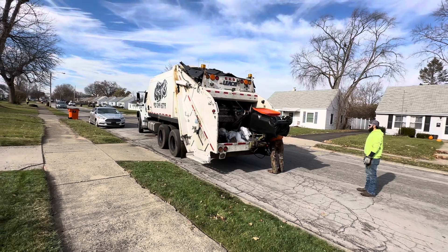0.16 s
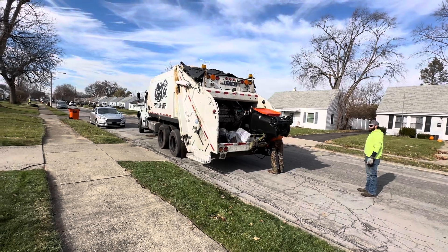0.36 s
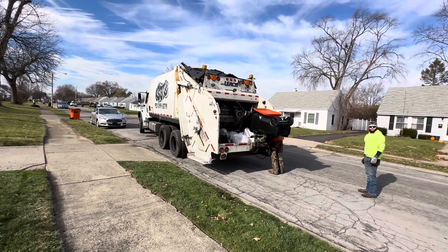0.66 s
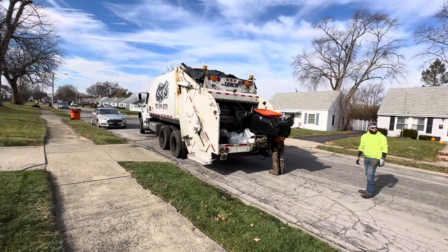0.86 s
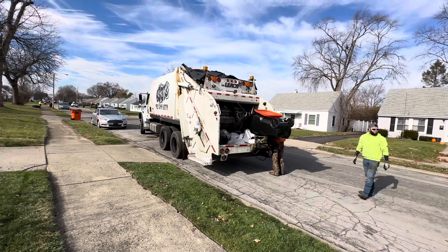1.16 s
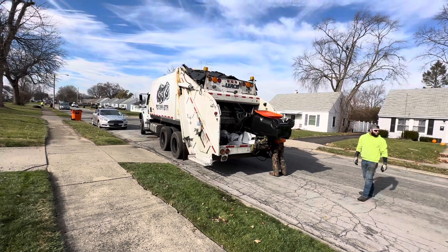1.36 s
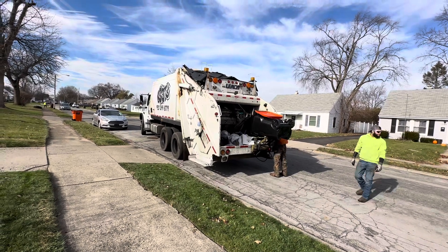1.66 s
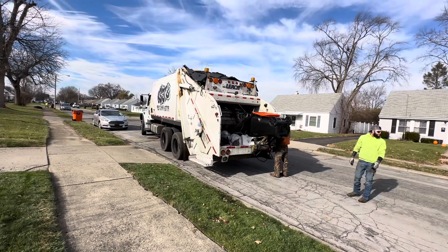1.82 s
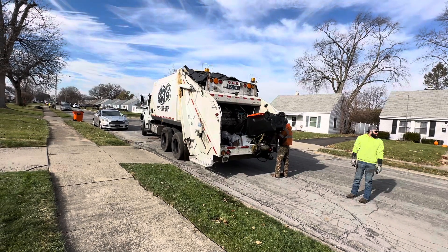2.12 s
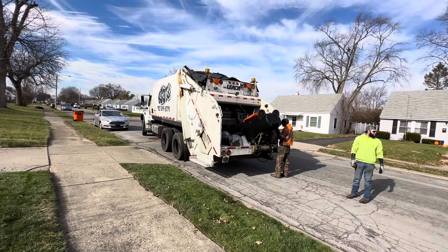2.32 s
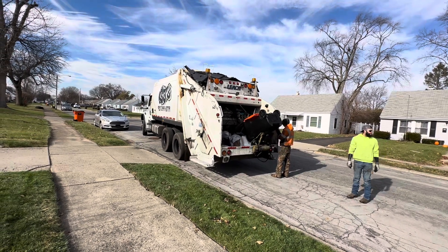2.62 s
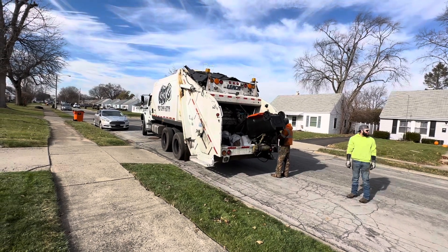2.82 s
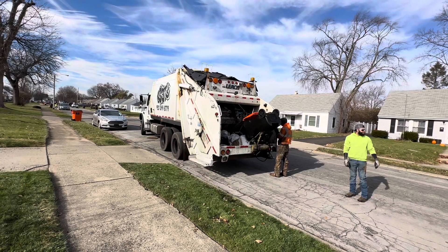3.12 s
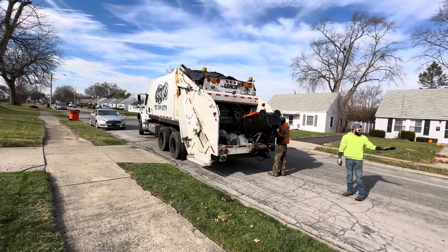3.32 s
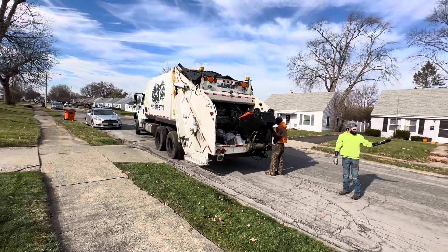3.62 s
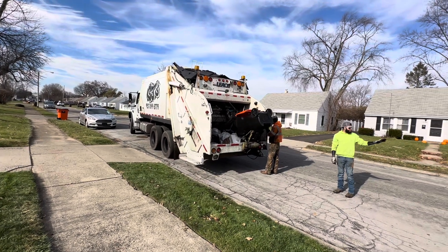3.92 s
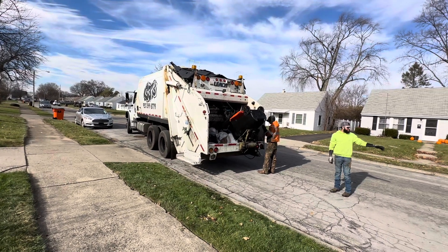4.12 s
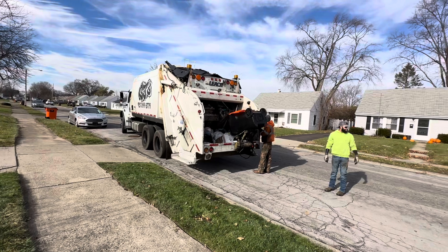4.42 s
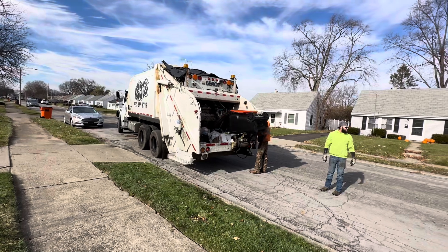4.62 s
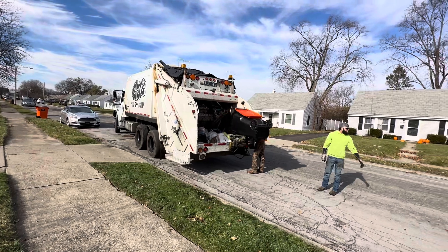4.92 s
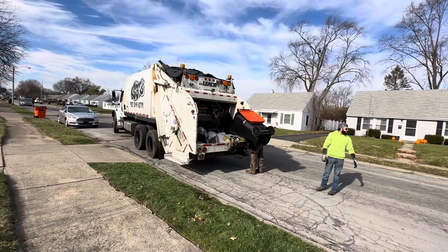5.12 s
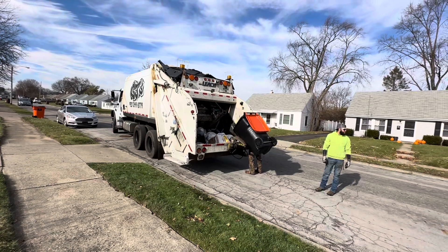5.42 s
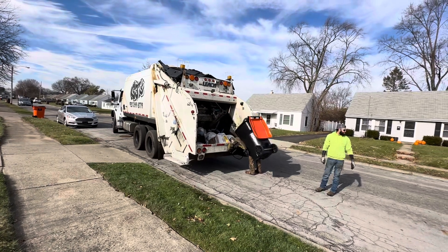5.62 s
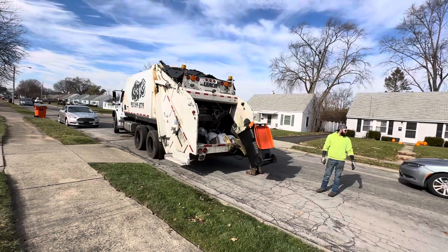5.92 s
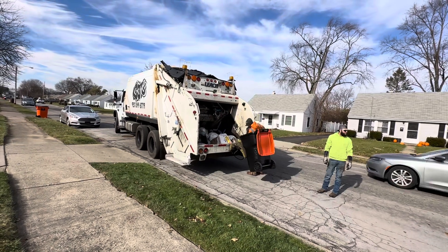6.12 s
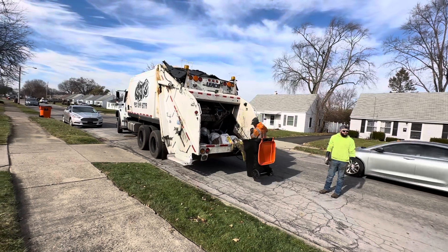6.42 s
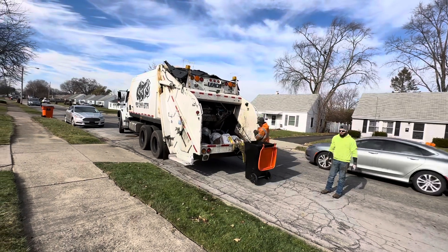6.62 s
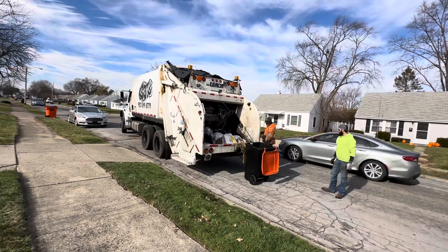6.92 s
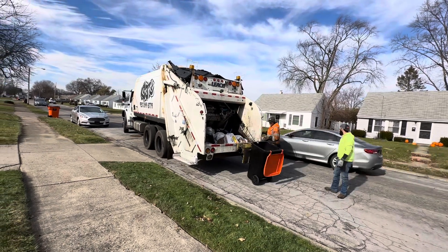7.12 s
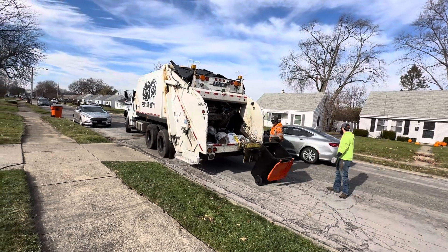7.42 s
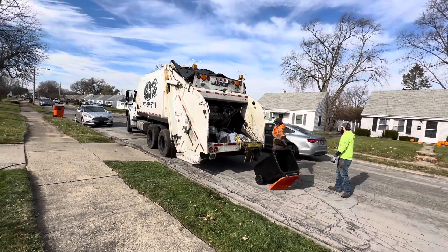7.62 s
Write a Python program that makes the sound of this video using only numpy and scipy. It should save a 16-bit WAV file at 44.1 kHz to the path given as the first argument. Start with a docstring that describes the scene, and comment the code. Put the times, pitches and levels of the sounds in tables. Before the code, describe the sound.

On a street, a refuse truck's diesel rumbles, hisses and rattles throughout, near the microphone and to the left. The revs rise a little and a plastic bin is shaken against the hopper in a run of hollow knocks and heavy thuds, while rubbish rustles softly out and pivots squeak thinly. After a pause in the knocking, the bin lands on the road with loud, sharp bangs as a car rolls past on the right.

```python
"""A refuse truck's diesel runs on a street, close to a microphone with two ports: truck left, bin right.
The engine roars, hisses, clatters with each firing and whines at its shafts and gears. It speeds up as the
hydraulic lifter raises a plastic bin on squeaking pivots, shakes it against the hopper and lowers it.
Rubbish rustles out; contacts ring the bin's walls and the hopper's panels, and metal clinks.
The bin drops on the road and tips over as a car's tyres roll by."""
import sys
import numpy as np
from scipy import signal
from scipy.fft import rfft, irfft
from scipy.io import wavfile

SR = 44100
rng = np.random.default_rng(int(sys.argv[2]) if len(sys.argv) > 2 else 0)


def dump_mix(stems):
    """Bounce the given channels to the path in sys.argv[1] as a 16-bit WAV at rate SR."""
    frames = np.atleast_2d(stems).T  # one column per channel
    limited = np.clip(frames, -1, 1)  # hard clip at full scale
    pcm = np.round(limited * 32767).astype(np.int16)
    wavfile.write(sys.argv[1], SR, pcm)


N = 342208
TIME = np.arange(N) / SR
HZ = np.maximum(np.arange(N // 2 + 1) * SR / N, 1)


def amp(db):
    return 10 ** (np.asarray(db) / 20)


def unit_rms(x):
    return x / np.sqrt(np.mean(x ** 2, axis=-1, keepdims=True) + 1e-20)


def in_time(curve):
    return np.interp(TIME, *np.transpose(curve))


def at_hz(curve):
    hz, value = np.transpose(curve)
    return np.interp(np.log(HZ), np.log(np.maximum(hz, 1)), value)


def noise_pair():
    return rng.standard_normal((2, N))


def colour(x, spectrum):
    """Gives a steady sound its spectrum, nothing outside it; rms 1."""
    inside = (HZ > spectrum[0][0]) & (HZ < spectrum[-1][0])
    return unit_rms(irfft(rfft(x) * amp(at_hz(spectrum)) * inside, N))


def drift(rate_hz):
    """A smooth random wander; rms 1."""
    step = 40
    pole = np.exp(-2 * np.pi * rate_hz * step / SR)
    slow = signal.lfilter([1], [1, -2 * pole, pole ** 2], rng.standard_normal(N // step + 2002))[2000:]
    return np.interp(np.arange(N) / step, np.arange(len(slow)), unit_rms(slow))


def tone(hz, level_db, waver_hz):
    """A sine that wavers in pitch and around its rms level."""
    gain = np.sqrt(2) * amp(level_db + 2 * drift(5.7))
    return gain * np.sin(2 * np.pi * np.cumsum(hz + waver_hz * drift(34)) / SR)


def noise_band(hz, width_hz):
    """A narrow band of noise that follows a pitch; rms 1."""
    pole = np.exp(-np.pi * width_hz / SR)
    real, imag = unit_rms(signal.lfilter([1], [1, -2 * pole, pole ** 2], noise_pair()))
    phase = 2 * np.pi * np.cumsum(hz) / SR
    return real * np.cos(phase) + imag * np.sin(phase)


def ring(force, modes):
    """Drives a body's modes, neighbours in opposite phase, each with a new random strength."""
    out = 0
    for k, (hz, level_db, t60_s) in enumerate(modes):
        pole, angle = amp(-60 / (t60_s * SR)), 2 * np.pi * hz / SR
        mode = signal.lfilter([0, np.sin(angle)], [1, -2 * pole * np.cos(angle), pole ** 2], force + 1e-18)
        out = out + amp(level_db) * rng.normal(1, 0.2) * (-1) ** k * mode
    return out


def add_hit(out, hit, start_s, peak_db):
    i = round(start_s * SR)
    out[i:i + len(hit)] += (amp(peak_db) * hit / np.abs(hit).max())[:N - i]


# The engine's low noise, close by: frequency_hz, relative_db
ROAR_SPECTRUM = [(22, -37), (65, -4.5), (130, -4), (167, -1), (190, -5), (221, 3), (262, -5.5), (289, -4),
                 (391, -9.5), (470, -14.5), (503, -11.5), (859, -13.5), (1050, -25.5), (1200, -20),
                 (1560, -25), (2000, -53)]
def roar(effort_db):
    """The diesel roars louder as it works harder."""
    return amp(-19.5 + effort_db + .5 * drift(31)) * colour(noise_pair(), ROAR_SPECTRUM)


# The engine's high noise: frequency_hz, relative_db
HISS_SPECTRUM = [(1760, -40), (3000, 1), (3440, -1.5), (4760, -5), (5310, -12.5), (6490, -8.5),
                 (7500, -16.5), (8030, -12), (11100, -21), (12700, -31.5), (15600, -36)]
def hiss(effort_db):
    """A flickering hiss follows the engine's effort weakly."""
    return amp(-44 + 0.37 * effort_db + 0.93 * drift(21)) * colour(noise_pair(), HISS_SPECTRUM)


# Lines of shafts and gears: tooth_rate_multiple
GEAR_ORDERS = [.192, 1, 1.385, 2, 4.2, 5, 5.305, 3.79, 5.648]
# Each line's level in the engine's three colours: early_db, middle_db, late_db
GEAR_LEVELS = [(-25, -53, -49), (-38.5, -38, -26.5), (-48, -34, -39), (-29, -69, -48.5), (-56, -31.5, -38),
               (-30, -65, -54), (-27.5, -66, -50), (-70, -44, -37), (-58, -29, -92)]
def gear_whine(tooth_hz, shares):
    """Shafts and gears sing at multiples of the pump's tooth rate; their balance shifts over time."""
    return sum(tone(order * tooth_hz, np.dot(levels_db, shares), waver_hz=.6 * order)
               for order, levels_db in zip(GEAR_ORDERS, GEAR_LEVELS))


# The engine's note: time_s, level_db
HUM_LEVEL = [(0, -25), (2.0, -27.5), (2.62, -25.5), (2.8, -38.5), (3.88, -37.5), (4.1, -27.5),
             (7.76, -32.5)]
def engine_hum(tooth_hz, order=.6925):
    """A rough, fluttering note follows the engine's speed."""
    return tone(order * tooth_hz, in_time(HUM_LEVEL) + 2.5 * drift(8.5), waver_hz=4)


# The clatter's three hollow, notched colours at the microphone: frequency_hz, relative_db
EARLY_SPECTRUM = [(900, -19), (954, -4), (1030, -5), (1140, -17), (1500, -1.5), (1900, -7), (2190, 1),
                  (2320, 2), (2480, -11.5), (2810, -9.5), (3320, -14), (3600, -57)]
MIDDLE_SPECTRUM = [(530, -21), (900, -1.5), (976, 0), (1100, -26), (1400, 2), (1710, -13), (1850, -1),
                   (2370, -13.5), (2630, -1.5), (3010, -22), (3600, -18.5), (4680, -39)]
LATE_SPECTRUM = [(530, -45), (900, -2), (970, -17), (1030, -33), (1240, -5.5), (1310, 6.5), (1590, -23.5),
                 (1730, 4.5), (1810, 3), (2020, 0.5), (2180, -31), (2370, -6), (2510, 5), (2600, -2.5),
                 (2780, -17), (2930, -4.5), (3080, -7), (3320, -18.5), (4680, -17)]
def clatter(tooth_hz, shares, firings_per_tooth=.0843, throb_db=0.9):
    """Each firing repeats one rattle of valves and injectors, over noise; both throb with the firings."""
    firings = np.cumsum(firings_per_tooth * tooth_hz) / SR
    pulses = np.diff(np.floor(firings), prepend=0) * amp(1.3 * drift(31))
    t = np.arange(2205) / SR
    burst = rng.standard_normal((2, len(t))) * np.exp(-t / .03)
    white_rattle = irfft(np.exp(1j * np.angle(rfft(burst))), len(t))
    repeated = unit_rms(signal.fftconvolve(pulses[None], white_rattle, axes=1)[:, :N])
    evenness = np.dot([.3, .6, .78], shares)   # most even in the late colour
    source = np.sqrt(evenness) * repeated + np.sqrt(1 - evenness) * noise_pair()
    source *= amp(throb_db * np.cos(2 * np.pi * firings))
    spectra = EARLY_SPECTRUM, MIDDLE_SPECTRUM, LATE_SPECTRUM
    return sum(share * colour(source, spectrum) for share, spectrum in zip(shares, spectra))


# How the engine's tone shifts over time: change_s, middle_colour_share, late_colour_share
TONE_SHIFTS = [(0, 0.19, 0.18), (2.2, 0.24, 0.38), (2.75, 0.52, 0.11), (3.5, 0.67, 0.071),
               (4.33, 0.01, 0.77), (6.72, 0.38, 0.17)]
def colour_shares(blend_s=0.39):
    """Each mix of the early, middle and late colours blends into the next; the shares sum to 1."""
    change_s, *columns = np.transpose(TONE_SHIFTS)
    arrived = np.clip((TIME - change_s[1:, None]) / blend_s + .5, 0, 1)
    middle, late = np.clip([share[0] + np.diff(share) @ arrived for share in columns], 0, 1)
    shares = np.array([np.clip(1 - middle - late, 0, 1), middle, late])
    return shares / shares.sum(axis=0)


# Engine speed at the hydraulic pump: time_s, tooth_rate_hz
PUMP_SPEED = [(0, 420), (1.5, 422), (2.05, 436), (2.7, 480), (3.25, 485), (4.6, 473.5), (7.1, 469.5),
              (7.76, 474)]
# How hard the engine works: time_s, effort_db
ENGINE_EFFORT = [(0, 0), (1.2, -1), (2.0, -.5), (2.7, 2), (3.3, 1), (4.4, .5), (6.4, -1), (7.76, -2)]
def diesel():
    """The engine close on the left, as a direct and a diffuse signal; its tones are direct only."""
    tooth_hz, effort_db, shares = in_time(PUMP_SPEED), in_time(ENGINE_EFFORT), colour_shares()
    engine = roar(effort_db) + hiss(effort_db)
    engine[0] += gear_whine(tooth_hz, shares) + engine_hum(tooth_hz)
    return engine + amp(-28.5 + 1.36 * effort_db) * clatter(tooth_hz, shares)


# Rubbish sliding out of the bin, at the truck: time_s, level_db
RUSTLE_LEVEL = [(1.6, -66), (2.6, -51), (3.1, -54), (4.3, -56.5), (4.7, -80)]
def rubbish_rustle(grains_per_s=500):
    """Paper and plastic crackle in clumps of small grains, direct and diffuse."""
    born = rng.random((2, N)) < grains_per_s * amp(4 * drift(9)) / SR
    strength_db = np.minimum(rng.exponential(1, (2, N)), 5)
    clicks = born * amp(strength_db) * rng.choice([-1, 1], (2, N))
    grain = rng.standard_normal((1, 200)) * np.hanning(200)
    crackle = signal.fftconvolve(clicks, grain, axes=1)[:, :N]
    return amp(in_time(RUSTLE_LEVEL)) * colour(crackle, [(3000, -23), (5000, 5), (9000, 0), (15000, -20)])


# The bin striking frame and road: start_s, hollow_db, crack_db, snap_db, t60_s, tilt_db_per_octave
BIN_KNOCKS = [(1.626, -15.5, -43, -40, 0.093, 2), (1.673, -16, -31, -27.5, 0.038, 4.5),
              (2.009, -36, -50, -43, 0.2, 9), (2.38, -9.5, -41, -42, 0.16, -4),
              (2.506, -11, -48, -33, 0.039, -8), (2.642, -16, -42, -52, 0.24, -7),
              (2.876, -18, -42, -44, 0.21, 3.5), (3.659, -17, -43, -41, 0.16, -6),
              (3.688, -11, -42, -40, 0.094, -6), (4.097, -14, -50, -55, 0.15, -6),
              (4.12, -11.5, -38, -39, 0.12, 1.5), (4.152, -17, -54, -58, 0.16, -11),
              (4.197, -16.5, -48, -54, 0.2, 2), (6.423, -23, -43, -39, 0.076, 5),
              (6.797, -10.5, -36, -38, 0.16, -1), (6.842, -9.5, -36, -41, 0.19, -4),
              (7.047, -3, -27, -46, 0.1, 0.5), (7.07, 0.5, -20.5, -24, 0.1, 1), (7.09, -12, -41, -45, 1, 3),
              (7.153, -8.5, -52, -54, 0.45, -2), (7.191, -24, -46, -46, .2, -11),
              (7.233, -14, -47, -50, 0.28, 3), (7.626, -8, -27.5, -36, 0.35, 2.5),
              (7.652, -19, -18, -36, 0.08, 3), (7.657, -5.5, -1, -3, 0.023, 3),
              (7.72, -26, -38, -35, 0.096, -3), (7.737, -6, -17, -14, 0.042, 2)]
# Its plastic walls: pitch_hz, relative_db, t60_s
BIN_MODES = [(330, -1, 0.016), (420, -7, 0.024), (590, 4, 0.0023), (733, -2, 0.0073), (774, 8.5, 0.0075),
             (1030, -24, 0.008), (1304, -1.5, 0.0097), (1616, -4, 0.024), (1690, -4.5, 0.01),
             (2190, -1.5, 0.011), (2960, -5.5, 0.0035)]
# A knock's two treble bands: frequency_hz, relative_db
CRACK_SPECTRUM = [(2500, 9), (3500, 1), (4700, 0.5), (6500, -9.5), (8000, -4)]
SNAP_SPECTRUM = [(6000, 19.5), (7500, 11.5), (10000, 12.5), (13000, -2), (14800, 4), (15900, -14)]
def bin_knocks(rise_s=0.00441, set_down_s=6.7, left_lag_s=.00019):
    """A dying spray of contacts rings the bin's walls; the crack and snap above it die sooner."""
    out, t = np.zeros((2, N)), np.arange(SR // 3) / SR
    crack, snap = colour(noise_pair(), CRACK_SPECTRUM), colour(noise_pair(), SNAP_SPECTRUM)
    crack = crack[0] + .5 * crack[1] * [[1], [-1]]   # both bands are partly alike left and right
    snap[1] = 0.4 * snap[0] + 0.78 * snap[1]
    soft_walls = signal.butter(3, 3230, fs=SR, output="sos")
    rise = 1 - np.exp(-(t / rise_s) ** 2)
    for start_s, hollow_db, crack_db, snap_db, t60_s, tilt_db in BIN_KNOCKS:
        decay_db = -60 * t / t60_s
        contacts = signal.sosfilt(soft_walls, rng.standard_normal(len(t)) * rise * amp(decay_db))
        modes = [(hz, level_db + tilt_db * np.log2(hz / BIN_MODES[0][0]), ring_s)
                 for hz, level_db, ring_s in BIN_MODES]
        left, other = ring(contacts, modes), ring(contacts, modes)
        hollow = np.array([left, 0.8 * left + 0.5 * other])
        i = round((start_s - rise_s / 2) * SR)
        n = min(len(t), N - i)
        treble = amp(crack_db) * crack[:, i:i + n] + amp(snap_db) * snap[:, i:i + n]
        treble *= (rise * amp(decay_db / 0.78))[:n]
        hit = amp(hollow_db) * hollow[:, :n] / np.abs(hollow).max() + treble
        # On the road the bin stands to the right, so the left port hears it later.
        lag, left_db = (round(left_lag_s * SR), 1) if start_s > set_down_s else (0, 0)
        out[0, i + lag:i + n] += amp(left_db) * hit[0, :n - lag]
        out[1, i:i + n] += hit[1]
    return out


# The turbo while the engine gathers speed: time_s, level_db
TURBO_LEVEL = [(1.7, -80), (2.1, -56), (2.9, -55), (3.3, -60)]
def turbo_whistle(order=14.05):
    """A breathy whistle at a multiple of the pump's tooth rate."""
    spooling = (TIME > TURBO_LEVEL[0][0]) & (TIME < TURBO_LEVEL[-1][0])
    return spooling * amp(in_time(TURBO_LEVEL)) * noise_band(order * in_time(PUMP_SPEED), width_hz=330)


# The lifter's pivots, heard in the centre: start_s, length_s, from_hz, to_hz, level_db
PIVOT_SQUEAKS = [(1.717, 0.2, 12400, 13450, -59), (2.573, .05, 13700, 13000, -63),
                 (2.635, 0.11, 12900, 13400, -61), (2.982, 0.069, 12500, 13900, -59),
                 (3.27, 0.067, 12500, 13500, -66), (3.487, .07, 12400, 13400, -61),
                 (3.78, 0.031, 12700, 13200, -63), (3.998, .06, 12600, 13540, -64)]
def pivot_squeaks(edge_s=.015):
    """Each thin squeak of a pivot glides from one pitch to another."""
    hz, gain = np.zeros(N), np.zeros(N)
    for start_s, length_s, from_hz, to_hz, level_db in PIVOT_SQUEAKS:
        t = TIME - start_s
        gate = np.clip(np.minimum(t, length_s - t) / edge_s, 0, 1)
        hz += (gate > 0) * (from_hz + (to_hz - from_hz) * t / length_s)
        gain += gate * amp(level_db)
    return gain * noise_band(hz, width_hz=350)


# Heavy jolts of hopper and bin: start_s, peak_db, panel_hz
JOLTS = [(2.388, -13, 170), (2.431, -20, 49.6), (2.675, -12.5, 70.5), (2.732, -13.5, 230),
         (2.868, -17.5, 230), (2.93, -16.5, 55), (3.161, -20, 81), (3.2, -12, 232), (3.463, -10.5, 233),
         (3.51, -19, 55.7), (3.689, -15, 69.1), (3.72, -11, 233), (3.822, -14.5, 240), (4.12, -9.5, 80),
         (6.85, -10.5, 168), (7.054, -6, 155), (7.09, -7, 81), (7.152, -9.5, 160)]
# The hopper's panels: pitch_hz, relative_db, t60_s
HOPPER_MODES = [(43, 4.5, 0.19), (57.7, 8, 0.092), (78.5, -3, 0.15), (108, 5.5, 0.14), (172.7, 0.5, 0.14),
                (187, -10.5, 0.22), (235.6, 2.5, 0.43), (295, 9.5, 0.094)]
def hopper_booms(contact_s=0.0045, falloff_db_per_octave=14):
    """A heavy contact rings the low modes, most those near the pitch of the struck panel."""
    out = np.zeros(N)
    push = np.pad(np.hanning(round(contact_s * SR)), (0, SR // 2))
    swell = np.clip(TIME[:len(push)] / 0.01, 0, 1)
    for start_s, peak_db, panel_hz in JOLTS:
        modes = [(hz, level_db - falloff_db_per_octave * abs(np.log2(hz / panel_hz)), t60_s)
                 for hz, level_db, t60_s in HOPPER_MODES]
        add_hit(out, ring(push, modes) * swell, start_s, peak_db)
    return out


# Short, bright metallic clinks: start_s, peak_db
METAL_CLINKS = [(2.878, -28), (2.891, -38), (7.223, -29)]
# Their ring: pitch_hz, relative_db, t60_s
METAL_MODES = [(4880, 0.5, 0.044), (5600, 2, 0.026), (6440, -2, 0.022), (6700, -3, .025)]
def metal_clinks():
    """A short contact rings a few high modes."""
    out, touch = np.zeros(N), np.pad(np.hanning(5), (0, SR // 10))
    for start_s, peak_db in METAL_CLINKS:
        add_hit(out, ring(touch, METAL_MODES), start_s, peak_db)
    return out


# A car passing to the right of the microphone: time_s, level_db
CAR_LEVEL = [(5.6, -62), (6.4, -47), (7.0, -24), (7.76, -34)]
# Its tyres on the road: frequency_hz, relative_db
TYRE_SPECTRUM = [(150, 13), (700, -1), (1500, -27), (3000, -27), (8000, -44)]
def passing_car():
    """Smooth tyre wash, with the ports swapped so that it reaches the right one first."""
    direct, diffuse = colour(noise_pair(), TYRE_SPECTRUM)
    return amp(in_time(CAR_LEVEL)) * from_left(direct, diffuse)[::-1]


# Left-right phase: frequency_hz, left_lead_rad
STEREO_PHASE = [(0, 0), (520, 1.2), (1800, 2.4), (2700, 2.2), (3700, 3.5), (4500, 5.1), (6400, 6.2),
                (8300, 9.4), (9400, 7.6), (10400, 2 * np.pi), (16000, 2 * np.pi)]
# Left-right balance: frequency_hz, left_minus_right_db
STEREO_BALANCE = [(200, 0), (380, -2), (700, 5.5), (1290, 5.5), (2380, 8), (4400, 4.5), (8120, -1),
                  (10500, -2)]
# Left-right likeness: frequency_hz, likeness_0_to_1
STEREO_LIKENESS = [(40, 0.9), (90, 1), (250, 1), (500, 0.27), (1000, 1), (2000, 0.6), (4000, 0.6),
                   (9000, 0.26), (10500, 1)]
def from_left(direct, diffuse):
    """The right port hears it later and partly by other paths. Above about 10 kHz the sound is mono."""
    alike = at_hz(STEREO_LIKENESS)
    delay = np.exp(-1j * np.interp(HZ, *np.transpose(STEREO_PHASE)))
    left = rfft(direct)
    right = alike * delay * left + np.sqrt(1 - alike ** 2) * rfft(diffuse)
    lean = amp(at_hz(STEREO_BALANCE) / 2)
    return irfft(np.array([left * lean, right / lean]), N)


def street_echoes(x):
    """Adds dull echoes off the truck's side and the house fronts, each at the opposite port."""
    dull, out = signal.lfilter([.04], [1, -1.6, .64], x), x.copy()
    for lag_s, level_db in [(.013, -5.5), (.031, -11.3), (.058, -3)]:
        lag = round(lag_s * SR)
        out[:, lag:] += amp(level_db) * dull[::-1, :-lag]
    return out


def scene():
    """The street at the two ports; only the knocks and booms echo."""
    direct, diffuse = diesel() + rubbish_rustle()
    vehicles = from_left(direct, diffuse) + passing_car()
    centre = turbo_whistle() + pivot_squeaks() + metal_clinks()
    return vehicles + centre + street_echoes(bin_knocks() + hopper_booms())


def record(dry, low_cut_hz=41.2, top_cut_hz=15500):
    """The microphone drops the deepest bass, peaks are rounded, the top is cut."""
    low_cut = signal.butter(3, low_cut_hz, "high", fs=SR, output="sos")
    top_cut = signal.ellip(10, .5, 90, top_cut_hz, fs=SR, output="sos")
    rounded = 1.285 * np.tanh(signal.sosfilt(low_cut, dry) / 1.115)
    return signal.sosfilt(top_cut, rounded)


dry = scene()
out = record(dry)
dump_mix(out)
```